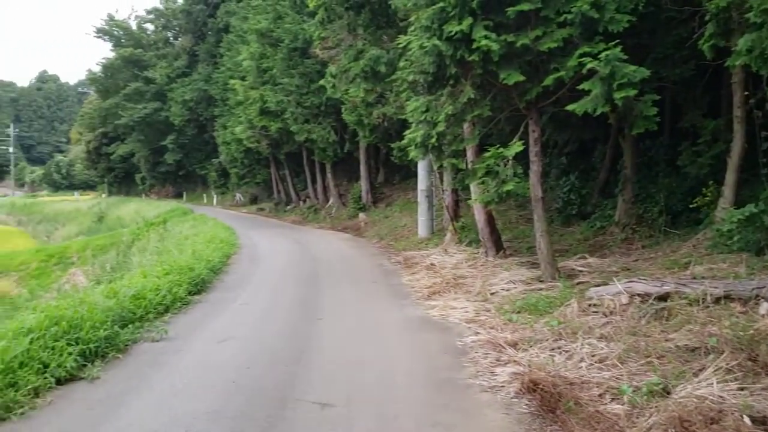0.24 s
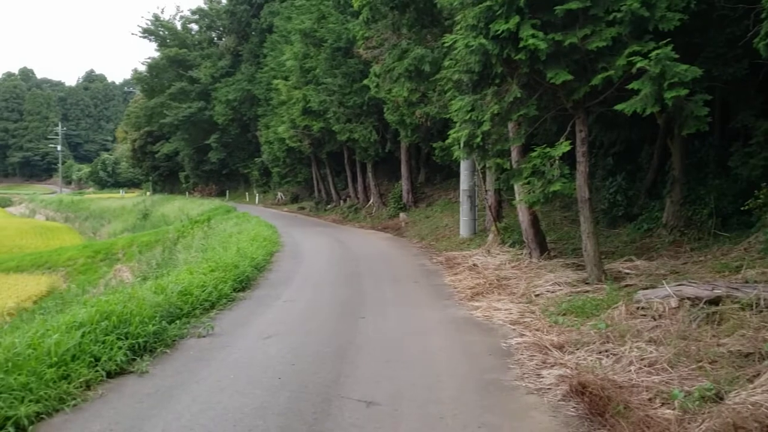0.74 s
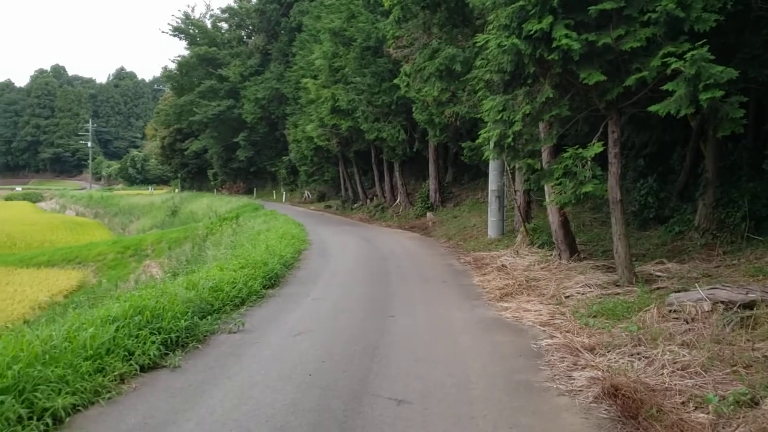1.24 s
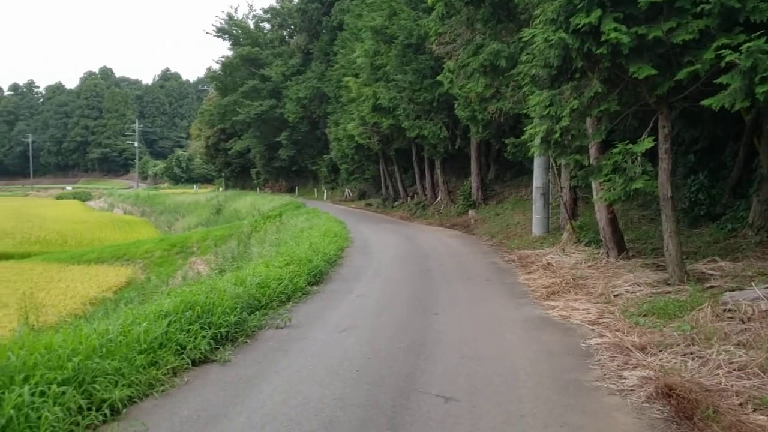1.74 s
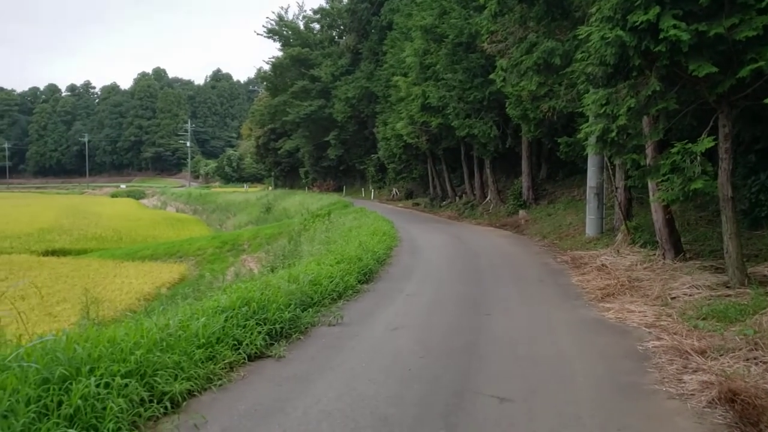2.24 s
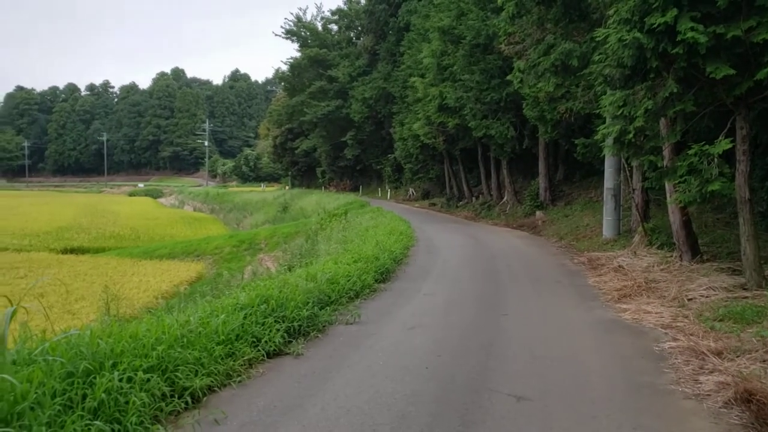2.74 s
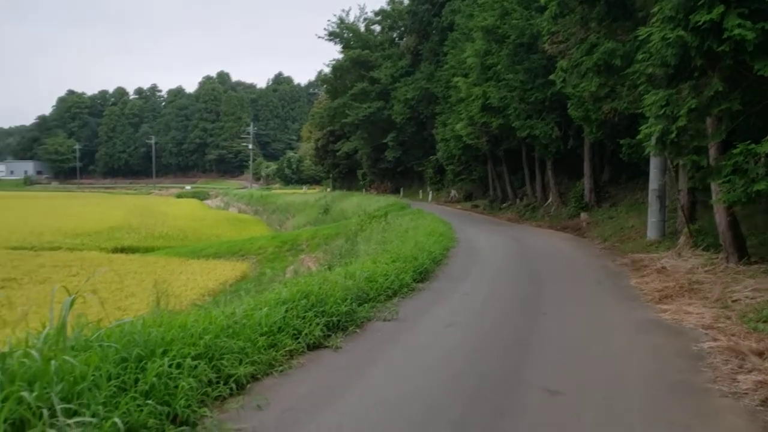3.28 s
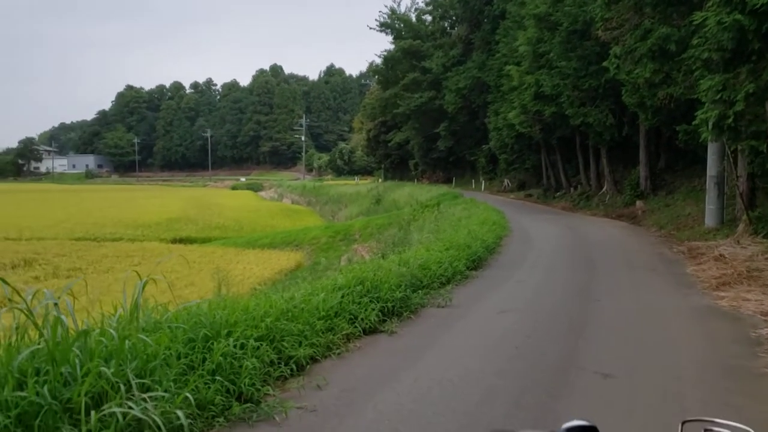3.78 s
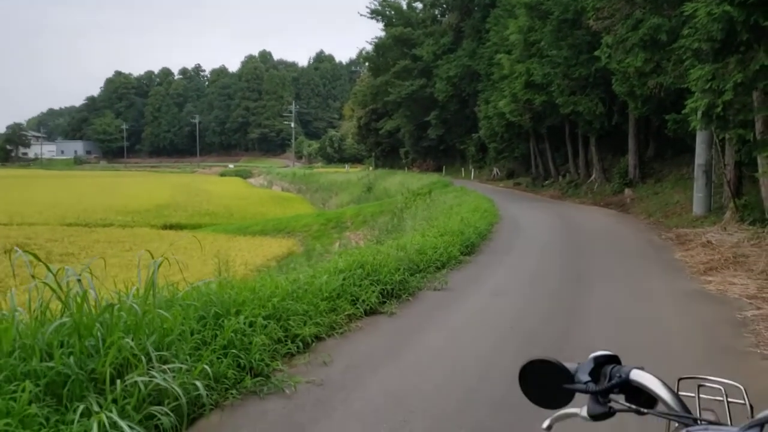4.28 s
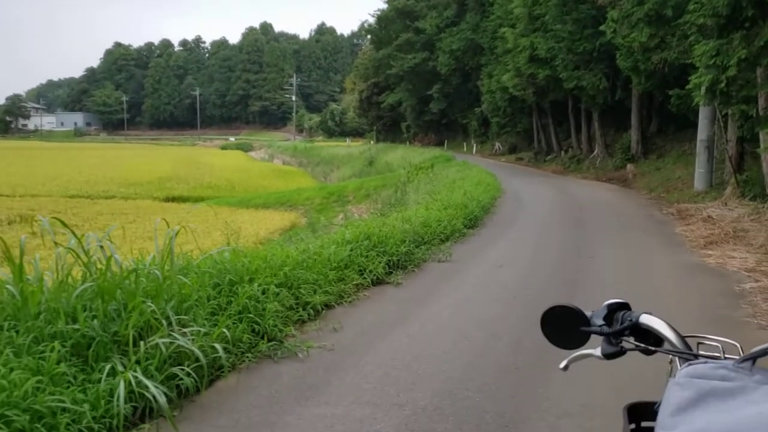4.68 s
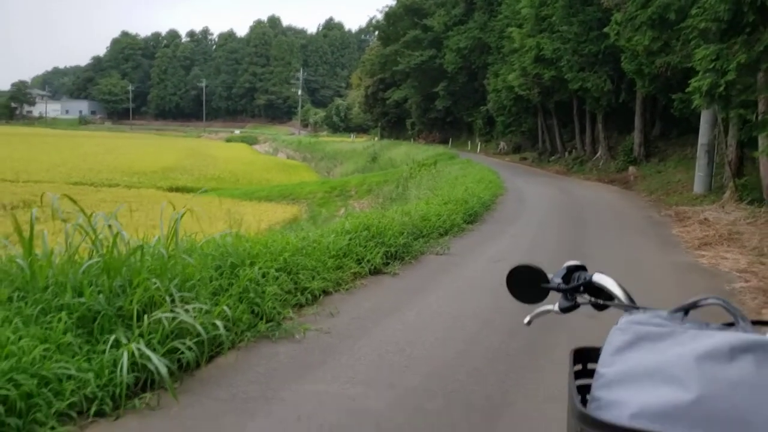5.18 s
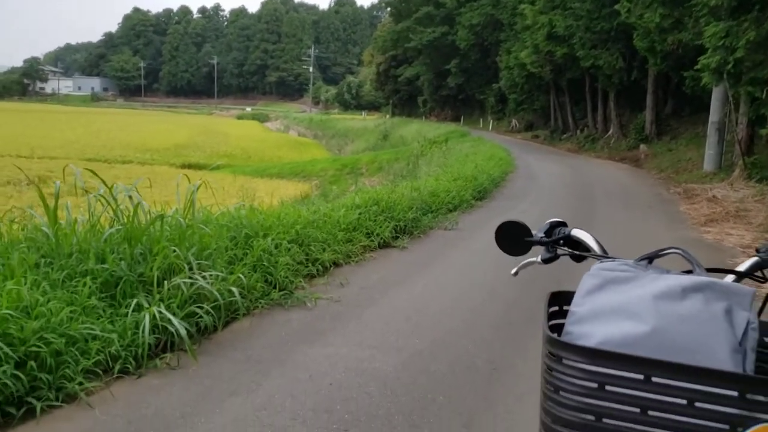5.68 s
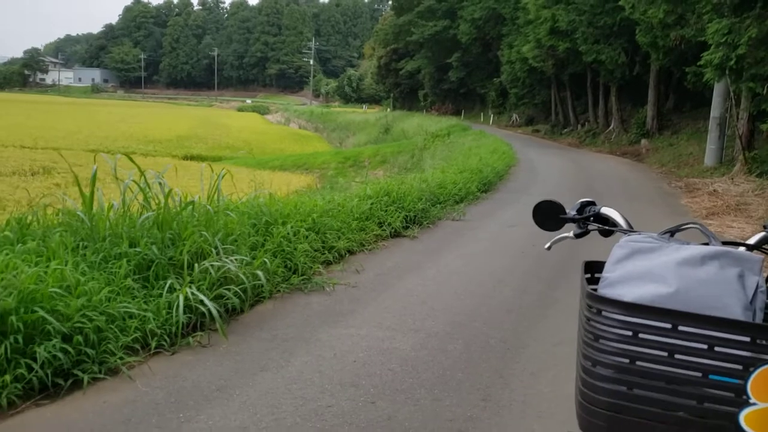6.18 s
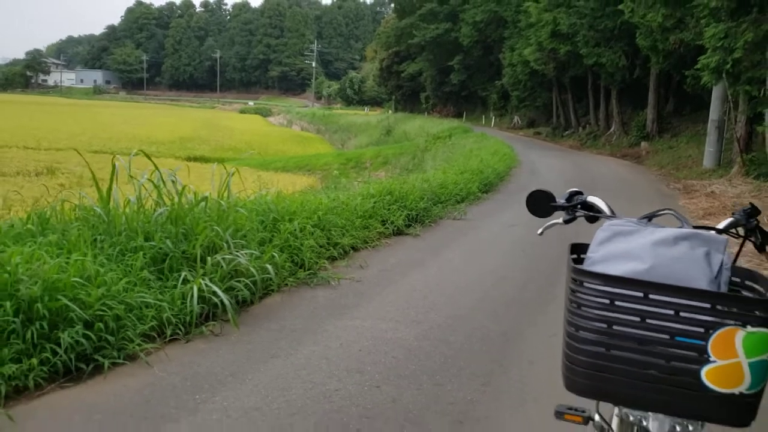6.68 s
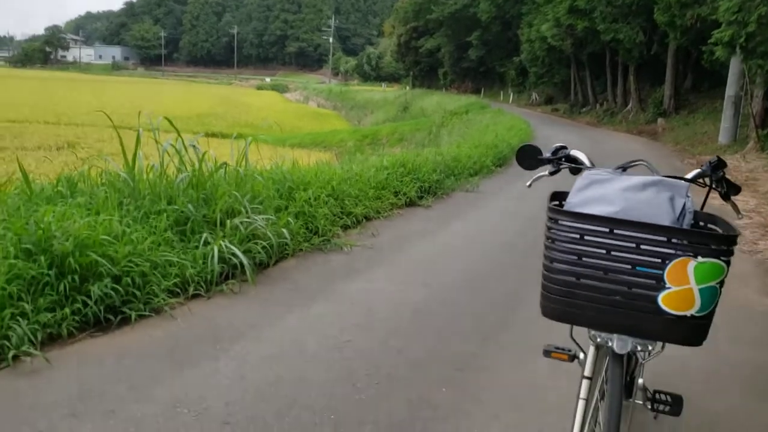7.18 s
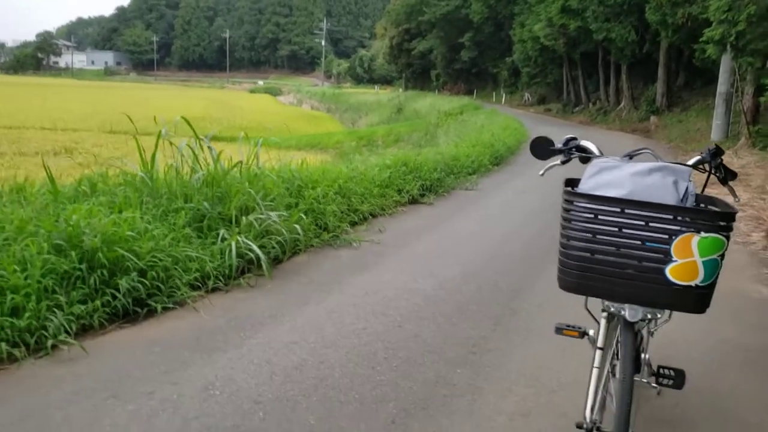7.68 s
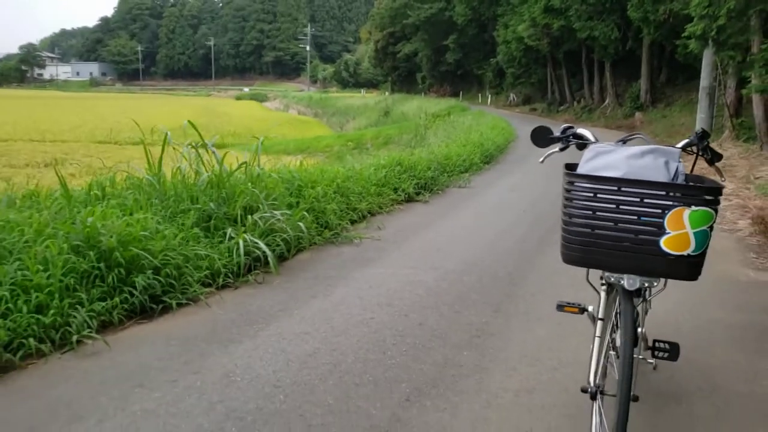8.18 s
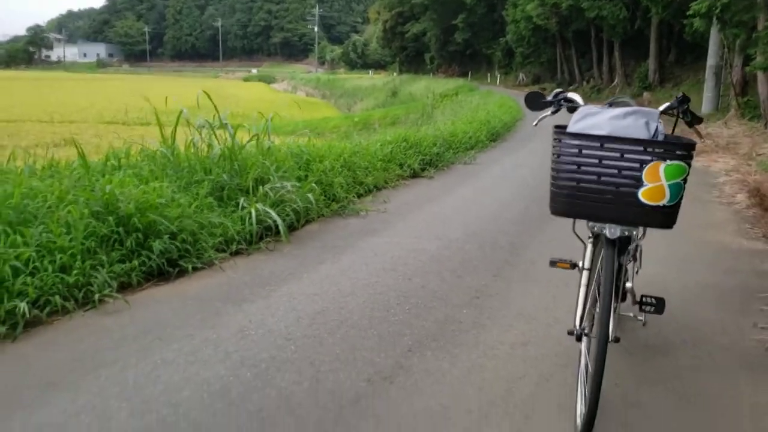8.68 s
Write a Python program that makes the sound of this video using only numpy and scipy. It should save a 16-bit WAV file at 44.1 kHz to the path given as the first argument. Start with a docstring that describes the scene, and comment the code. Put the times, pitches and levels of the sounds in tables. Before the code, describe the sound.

Outdoors beside a wood and rice fields, evening cicadas sing in quick, ringing pulses, about eight a second. One fades, a second swells early and slows, then a louder one bursts in after the middle. A blurred, echoing chorus and airy insect hiss lie behind. Low wind flutters on a handheld microphone, strongest at the end, with faint scuffs and soft heel thuds from slow steps.

```python
"""Evening cicadas trill in the trees beside a rice-field lane: five near ones, a blurred chorus behind them.
Each syllable is a stack of partials buzzed by the drumming muscles; fading noise tails make the wood's echo.
Shaped noise makes the hiss of distant insects and leaves, a road humming far off and wind on two microphone
ports. Someone walks slowly backwards: soles scuff as bursts of noise, heels thud as short low rings."""
import sys
import numpy as np
from scipy import signal
from scipy.fft import rfft, irfft, next_fast_len
from scipy.io import wavfile
from scipy.ndimage import uniform_filter1d

SR = 44100
rng = np.random.default_rng(int(sys.argv[2]) if len(sys.argv) > 2 else 0)


def pcm_store(signal):
    """Save signal as 16-bit PCM."""
    levels = np.round(np.clip(np.atleast_2d(signal), -1, 1) * 32767)
    wavfile.write(sys.argv[1], SR, levels.astype(np.int16).T)


N = 393813  # samples in the scene


def undb(db):
    """Turn decibels into a factor on the amplitude."""
    return np.exp(np.asarray(db) * np.log(10) / 20)


def level(x, db):
    """Scale a sound to the given average (rms) level in dB."""
    return x * undb(db) / np.sqrt(np.mean(x ** 2))


def curves(table, times=None):
    """Join the rows of a time table by straight lines: one value a sample, or at the given times in s."""
    if times is None:
        times = np.arange(N) / SR
    row_times, *columns = np.transpose(table)
    return np.array([np.interp(times, row_times, column) for column in columns])


def sides(pan_db):
    """Factors for the left and right port that differ by pan_db."""
    return undb(np.array([pan_db, -pan_db]) / 2)


def add(out, x, s):
    """Mix x into out from time s, cutting off whatever runs past the end."""
    i = int(s * SR)
    out[..., i:i + x.shape[-1]] += x[..., :max(out.shape[-1] - i, 0)]


def coloured(points, channels):
    """Noise whose spectrum follows the (f/Hz, level/dB) points."""
    size = next_fast_len(N)
    hz, db = np.transpose(points)
    bins_hz = np.arange(size // 2 + 1) * SR / size
    gain = undb(np.interp(np.log(bins_hz + 1), np.log(hz), db, -90))
    white = rng.standard_normal((channels, size))
    return irfft(rfft(white) * gain, size)[:, :N]


def walk(rate):
    """A random wandering curve: values held for 1 / rate s, smoothed twice; spread near 1."""
    k = int(SR / rate)
    stairs = np.repeat(rng.standard_normal(N // k + 1), k)
    return 1.47 * uniform_filter1d(uniform_filter1d(stairs, k), k)[:N]


def wide(points, db, shared):
    """Steady coloured noise of which a share is common to both ports."""
    mid, *ears = coloured(points, channels=3)
    return level(shared * mid + np.array(ears), db)


def trunks(x, t60_s):
    """Dense scatter off the trunks: a noise tail fading by 60 dB in t60_s, of unit energy, for each ear."""
    t = np.arange(SR) / SR
    fade = np.exp(-np.log(1000) * t / t60_s)
    onset = 1 - np.exp(-t / 0.0037)
    tail = rng.standard_normal((2, SR)) * fade * onset
    tail /= np.sqrt(np.sum(tail ** 2) / 2)
    return signal.fftconvolve(x[None], tail, axes=1)[:, :len(x)]


def syllable(length_s, hz, peak_db, glide_hz, slow, buzz_db, buzz_phase):
    """Six complex partials; the muscles buzz each at their rate and at half of it."""
    # envelope and buzz, one row per partial: rise/s (times slow), share of the length before the fall,
    # sag/(dB per s), fall/s, lower buzz line/dB, upper buzz line/dB, half-rate lines/dB;
    # buzz_db is added to the three buzz columns
    partial_rows = [(0.01, 1.54, -25, .006, -22, -21, -14), (0.013, 1.5, -22.5, 0.0031, -10, -15.5, -29),
                    (.0028, 1.8, -150, 0.0065, -5, -13, -34), (.0028, 1.4, -110, .006, -1.5, -34, -14.5),
                    (.0028, 0.59, -110, .006, 0.5, -18, -23), (.0035, 1.03, -110, .006, 2, -9, -15)]
    sixth_db = -12.5  # sixth partial against the fifth
    t = np.arange(int(.075 * SR)) / SR
    rise, share, sag_db, fall, low_db, up_db, half_db = np.transpose(partial_rows)[:, :, None]

    attack = 1 - np.exp(-t / np.abs(rise * slow))
    decay = np.exp(-np.maximum(t - share * length_s, 0) / np.abs(fall))
    shape = attack * undb(sag_db * t) * decay

    buzz_hz = 312.2 * hz / 2130  # the muscle rate follows the pitch
    half = np.exp(1j * (np.pi * buzz_hz * t + buzz_phase))  # turns at half the muscle rate
    full_rate = undb(low_db) * half.conj() ** 2 + undb(up_db) * half ** 2
    half_rate = 2 * undb(half_db) * half.real
    buzz = 1 + undb(buzz_db) * (full_rate + half_rate)

    turns = hz * t + glide_hz * (t / length_s - 1) * t / 2
    first = np.exp(2j * np.pi * turns)
    stack = np.cumprod(np.tile(first, (len(partial_rows), 1)), axis=0)  # powers of the first partial
    all_db = np.append(peak_db, peak_db[-1] + sixth_db)
    return undb(all_db)[:, None] * shape * buzz * stack


def far_chorus(count=9):
    """Many singers deep in the wood, each at its own pitch and pace, heard only as echo; they began a second ago."""
    # swells of the chorus: t/s, swell/dB, level of the first partial/dB, middle pitch f/Hz
    chorus_swells = [(0.0, 2.5, -57.5, 2140), (0.89, 2, -57, 2128), (1.66, 3, -58, 2120),
                     (2.19, 2.5, -59, 2124), (2.86, 2, -56, 2121), (3.5, -1, -59, 2130),
                     (4.23, -4.5, -59.5, 2124), (5.62, -4.5, -62, 2122), (6.14, -0.5, -60, 2145),
                     (6.6, 7, -53.5, 2153), (7.3, 4, -55.5, 2146), (7.83, 6, -55.5, 2152),
                     (8.93, 3.5, -57, 2151)]
    # partials 2 to 5, a row each: level/dB, level gained per dB of swell/(dB per dB)
    upper_partials = [(-53.5, 1), (-60.5, 1.23), (-63, 1), (-64.5, 0.4)]
    timbre_db, gained = np.transpose(upper_partials)
    out = np.zeros(N + SR)  # one second more at the start
    for place in np.linspace(-1, 1, count):
        pace_s = .12 + .012 * rng.standard_normal()
        for s in np.arange(rng.random() * pace_s, N / SR + 1, pace_s):
            swell_db, first_db, middle_hz = curves(chorus_swells, s - 1)
            hz = middle_hz + 65 * place + 12 * rng.standard_normal()
            peak_db = np.append(first_db, timbre_db + gained * swell_db) + 3 * rng.standard_normal(5)
            voice = syllable(0.0331, hz, peak_db, glide_hz=-16.0, slow=0.84, buzz_db=-0.54,
                             buzz_phase=10 * rng.standard_normal())
            add(out, voice.real.sum(0), s)
    return trunks(out, t60_s=1)[:, SR:] * sides(1.8)[:, None]


def distant_hiss():
    """Distant insects and leaves: noise that swells as the listener turns and the chorus grows."""
    # spectrum, of which only the shape counts: f/Hz, level/dB
    hiss_colour = [(400, -18.5), (700, -18.5), (1450, -20), (1800, -5.5), (2600, -10), (3550, -10.5),
                   (3850, 2), (5300, 4), (7300, -2.5), (8900, -9), (9400, -14.5), (10000, -16),
                   (12000, -6.5), (15500, -11.5)]
    # loudness, around which the hiss wavers: t/s, level/dB
    hiss_levels = [(0.0, -55.5), (1.19, -53.5), (2.11, -55), (2.86, -53), (6.12, -53), (6.72, -50),
                   (8.93, -50.5)]
    swell = undb(curves(hiss_levels) + 0.69 * walk(5))
    return wide(hiss_colour, 0, shared=0.21) * swell * sides(1)[:, None]


def far_road():
    """A far-off road: low noise, mostly alike at both ports, that grows as the road draws nearer."""
    # spectrum, of which only the shape counts: f/Hz, level/dB
    road_colour = [(100, -11), (170, -2.5), (310, -2.5), (400, -10.5), (600, -17.5)]
    # loudness, around which the rumble wavers: t/s, level/dB
    road_levels = [(0, -75), (1.5, -69), (3.5, -67), (8.93, -67)]
    return wide(road_colour, 0, shared=1.35) * undb(curves(road_levels) + 2.8 * walk(3.97))


def rings(table, cycles, alike):
    """Each row pushes a low resonance that swells and dies within a few cycles; alike 1 = in step at both ports."""
    out = np.zeros((2, N))
    t = np.arange(int(.12 * SR)) / SR
    for s, db, hz, pan_db in table:
        phase = np.array([[0], [(1 - alike) * rng.standard_normal()]])
        age = t * hz / cycles  # 1 at the top of the swell
        swell = (age * np.exp(1 - age)) ** 2
        ring = np.sin(2 * np.pi * hz * t + phase) * swell
        add(out, undb(db) * ring * sides(pan_db)[:, None], s)
    return out


def wind():
    """Turbulence presses on each port alone and flutters; eddies land as single buffets on the windward port."""
    # steady wind: t/s, average level/dB, left minus right/dB
    wind_levels = [(0.0, -57.5, -7), (0.5, -56, -2.5), (0.9, -52.5, -1), (2.1, -53, -4.5), (3.6, -51.5, -4),
                   (4.15, -53.5, -3.5), (4.9, -51.5, -6), (6.2, -51, -4), (6.67, -52, -7), (7.05, -50, -1),
                   (7.68, -54, -7.5), (7.98, -46, 7), (8.45, -43, 9), (8.55, -51.5, -2.5), (8.68, -41, 10),
                   (8.83, -45, 1.5), (8.93, -40.5, 10)]
    # spectrum, of which only the shape counts: f/Hz, level/dB
    wind_colour = [(12, -30), (20, -2), (35, -5.5), (59, 5.5), (124, -8), (143, -11.5), (167, -15.5),
                   (260, -28.5), (340, -36.5), (570, -120)]
    # single buffets: t/s, top of the swell/dB, f/Hz
    buffet_rows = [(0.557, -40, 73.7), (0.942, -43, 51.8), (1.153, -42, 116), (1.501, -42, 51),
                   (1.796, -49, 61.4), (2.179, -39.5, 56.7), (2.348, -41, 102), (2.481, -41, 56.5),
                   (2.771, -37.5, 79), (3.646, -42, 52.6), (4.86, -51, 80), (5.351, -47, 73.5),
                   (6.9, -53, 120), (7.098, -48, 54.4), (7.109, -43, 130), (7.318, -51, 42.7),
                   (7.817, -43, 57.7), (7.995, -36.5, 87.6), (8.064, -36, 122), (8.116, -41.5, 62),
                   (8.2, -58, 61.9), (8.256, -33.5, 75), (8.338, -36.5, 58), (8.397, -34, 115),
                   (8.428, -42, 65), (8.655, -33.5, 70.5), (8.686, -35, 64.7), (8.808, -40, 78.1),
                   (8.884, -43, 96)]
    buffet_lean = 2.77  # a buffet's left-right difference is this many times the steady wind's, in dB
    level_db, pan_db = curves(wind_levels)
    flutter = undb([1.8 * walk(25), 1.87 * walk(25)])
    turbulence = level(coloured(wind_colour, channels=2) * flutter, 0)
    steady = turbulence * undb(level_db) * sides(pan_db)
    buffets = [(s, db, hz, buffet_lean * curves(wind_levels, s)[1]) for s, db, hz in buffet_rows]
    return steady + rings(buffets, cycles=0.92, alike=-1.8)


def near_cicadas():
    """Direct sound, each partial with its own phase at the two ports and a trembling level, plus the wood's echo."""
    # one table per cicada, a row per syllable: t/s, level/dB (the timbre and scatter below are added)
    songs = [
        [(0.02, -47.5), (0.141, -45.5), (0.294, -47), (0.462, -46), (0.582, -48), (0.696, -46.5), (0.825, -45),
         (0.939, -48), (1.074, -50), (1.191, -49), (1.314, -50), (1.431, -49.5), (1.551, -52)],
        [(0.938, -39), (1.047, -36.5), (1.162, -34.5), (1.266, -35), (1.377, -37), (1.49, -36.5), (1.6, -35),
         (1.715, -34.5), (1.831, -34.5), (1.959, -37), (2.066, -37), (2.183, -37), (2.31, -40), (2.429, -40),
         (2.55, -41), (2.663, -40.5), (2.779, -42.5), (2.9, -44.5), (3.022, -47.5), (3.141, -47.5),
         (3.264, -47), (3.383, -45), (3.505, -47), (3.623, -45.5), (3.743, -49), (3.869, -49), (3.988, -46.5),
         (4.114, -46), (4.238, -44.5), (4.361, -44.5), (4.485, -46), (4.615, -46), (4.74, -50.5),
         (4.864, -49.5), (4.999, -49), (5.125, -49), (5.261, -53), (5.393, -54), (5.53, -50.5), (5.675, -52.5),
         (5.817, -51.5), (5.964, -49.5), (6.122, -49.5), (6.287, -50.5), (6.48, -51), (6.683, -48.5),
         (6.911, -50), (7.163, -46.5), (7.452, -49)],
        [(5.7, -35), (5.819, -35), (5.922, -35.5), (6.029, -31.5), (6.132, -27.5), (6.233, -29.5), (6.344, -30),
         (6.446, -29.5), (6.557, -33), (6.668, -33.5), (6.781, -35.5), (6.9, -34), (7.016, -34), (7.131, -32),
         (7.251, -31), (7.364, -31), (7.483, -32.5), (7.605, -34.5), (7.726, -34), (7.846, -35.5), (7.957, -38),
         (8.072, -37.5), (8.198, -37), (8.318, -37), (8.445, -39), (8.558, -37.5), (8.672, -41), (8.79, -45),
         (8.912, -46)],
        [(6.448, -46.5), (6.568, -40.5), (6.664, -46), (6.781, -45), (6.904, -40), (7.024, -41), (7.147, -51),
         (7.267, -44.5), (7.387, -40), (7.51, -39), (7.633, -48), (7.753, -52), (7.876, -46), (8.002, -45.5),
         (8.137, -47), (8.251, -44), (8.371, -45.5), (8.5, -48), (8.623, -47), (8.752, -47), (8.887, -45.5)],
        [(7.032, -44), (7.158, -44.5), (7.29, -42.5), (7.416, -42.5), (7.539, -49), (7.665, -43), (7.791, -45),
         (7.917, -46.5), (8.046, -46)],
    ]
    # how each song runs, one table per cicada: t/s, pitch f/Hz, syllable length/s,
    # change of the third partial/dB, change of the partials above it/dB, left minus right/dB
    phrases = [
        [(0.14, 2138, 0.022, -5, -3.5, -3), (0.7, 2139, 0.029, -3, 0, 4), (1.55, 2117, 0.018, 5, 3.5, 0)],
        [(0.94, 2053, 0.016, -10, -11.5, 3), (1.16, 2100, 0.013, -13, -7.5, -0.5),
         (1.4, 2135, 0.025, -12, -4.5, -0.5), (1.95, 2128, 0.027, -7, -5, 1.5),
         (2.31, 2113, 0.025, -1, -3.5, -1), (2.75, 2094, .029, 4, 0.5, -2), (3.4, 2077, 0.028, 3, 5.5, -3.5),
         (3.8, 2083, 0.025, 4.5, 7.5, 3), (4.5, 2082, 0.024, -0.5, 5, -0.5), (5.05, 2072, 0.025, 7.5, 5.5, -1),
         (5.7, 2053, 0.029, 12.5, 7.5, -0.5), (6.5, 2034, 0.021, -2, 10.5, 0), (7.45, 2026, 0.019, -11, 0, -4)],
        [(5.7, 2045, 0.0051, -12, -25, 0), (6.03, 2171, 0.018, -4, -27, 2), (6.2, 2200, 0.026, -3, -8.5, -0.5),
         (6.45, 2191, 0.042, -4.5, -6.5, -1), (6.85, 2171, .03, 3, 2, 2.5), (7.3, 2162, 0.025, -3.5, -5, 4.5),
         (8.0, 2144, 0.025, 4, 2, 1), (8.45, 2141, 0.013, 4.5, 1, -0.5), (8.92, 2141, 0.029, 2, 9.5, 4)],
        [(6.45, 2205, 0.039, -6, -1, -2), (6.7, 2255, 0.03, 7, 11, 5), (7.2, 2227, 0.027, -9, -6, -12),
         (8.0, 2211, 0.036, 6, 3, 4), (8.9, 2196, 0.033, 5.5, 1, -8)],
        [(7.03, 2197, 0.029, -8, 0.5, 6), (8.05, 2180, 0.041, 5, -2.5, 6)],
    ]
    # one row per cicada: level of partials 1 to 5/dB against the song's level
    timbres = [(-7.5, 0.0049, -1, -3, -9), (-8.5, 0.0057, -3.5, -2, -5.5), (-16.5, 0, -3, -11.5, -19.5),
               (-11, 0.046, -7, -11, -13), (-19, 0, -10, -7, -2.5)]
    # one row per cicada: pitch glide over a syllable/Hz, slowness of attack (a factor), buzz/dB
    singers = [(-4.5, 0.79, -6), (-12.5, 0.76, -7), (7, 0.4, -4), (-8.5, 0.76, -5.5), (-11, 0.72, -9)]
    # one row per cicada, a column per partial: how far the left port leads the right/rad
    port_leads = [(.4, 1.2, 1., -2.2, 1.2, 1.2), (.2, 1.2, 1.3, .5, 2.2, 1.5),
                  (-2.8, -1.5, 1.2, -.6, .5, 2.), (.5, 1.3, 1.2, 1.3, 1.2, 1.2),
                  (.5, 1.3, 1.2, -.6, .5, 1.2)]
    # one row per cicada, a column per partial: how much the phone's body favours the left port/dB
    body_leans = [(2.7, 6.6, 3.3, -8, -7, 1), (5.4, 2.4, 1, -6, -5.5, 1), (2.6, 2.6, 3.6, 3, 8, 1),
                  (1, 1, 1.5, -7, -3, 1), (1, 1, 1.5, 2, -2.5, 1)]
    scatter_db, buzz_scatter_db = 1.5, 2.05  # from syllable to syllable
    lead_scatter = 0.13  # rad, times the number of the partial
    rough, rough_hz = 0.2, 138.5  # roughness of the partials: depth and rate
    out = np.zeros((2, N))
    wobble = 1 + rough * (walk(rough_hz) + 1j * walk(rough_hz))

    cicadas = zip(songs, phrases, timbres, singers, port_leads, body_leans)
    for song, phrase, timbre_db, (glide_hz, slow, buzz_db), leads, lean_db in cicadas:
        for s, db in song:
            hz, length_s, third_db, upper_db, pan_db = curves(phrase, s)
            peak_db = db + np.add(timbre_db, [0, 0, third_db, upper_db, upper_db])
            peak_db = peak_db + scatter_db * rng.standard_normal(5)
            voice = syllable(length_s, hz, peak_db, glide_hz, slow,
                             buzz_db + buzz_scatter_db * rng.standard_normal(),
                             buzz_phase=10 * rng.standard_normal())

            # each partial trembles by its own stretch of the wobble and starts at its own phase
            chance = rng.standard_normal((6, 1))
            stretch = (N * np.abs(chance)).astype(int) + np.arange(voice.shape[1])
            voice = voice * wobble[stretch % N] * np.exp(10j * chance)

            left, right = sides(pan_db + np.array(lean_db))
            numbers = np.arange(1, len(leads) + 1)
            lag = np.exp(-1j * (leads + lead_scatter * numbers * rng.standard_normal(6)))
            add(out, np.array([left @ voice, (right * lag) @ voice]).real, s)

    wood = undb(-17.5) * trunks(out.mean(0), t60_s=0.98)
    leaves = undb(-10.5) * trunks(out[0], t60_s=0.079)  # quick scatter close to each singer
    return out + wood + leaves


def footsteps():
    """A scuff is grainy noise with a dull and a bright part; a thud is one quickly damped low ring."""
    # heels and handling thuds: t/s, top of the swell/dB, f/Hz, left minus right/dB
    thuds = [(0.564, -57, 204.5, -20), (1.152, -55, 208, -14), (2.734, -41, 266, -3.0),
             (2.842, -39, 238, -3.5), (3.442, -52, 342, -2.5), (4.016, -52, 308.7, -3.5),
             (4.178, -56, 197.7, -30), (4.679, -55.5, 202, -2.0), (4.875, -49, 290, -3),
             (5.34, -55, 310.3, -3.5), (5.766, -53.5, 198, -4), (6.0, -49, 310, -2.0),
             (6.642, -50.5, 223, -2.5), (6.716, -48.5, 207, 0.0), (7.106, -50, 243, -13),
             (7.494, -52, 279, -3.5), (7.761, -54, 224, -25), (8.321, -47.5, 282, 2.5), (8.79, -49, 340, 0)]
    # soles scuffing grit: t/s, level/dB, length/s (stretched 1.6 times), gain of the bright part/dB
    scuffs = [(2.5, -66.5, 0.066, 3), (2.82, -66, 0.062, 6), (3.281, -63.5, 0.1, -17),
              (3.406, -67, 0.038, -15), (3.717, -75, .15, 10), (3.838, -63, 0.048, 9),
              (4.427, -63.5, 0.079, 1), (4.865, -63, 0.028, 1), (5.35, -63, 0.051, 3),
              (5.765, -59.5, 0.032, 6.5), (6.706, -65.5, 0.04, 5.5), (7.095, -63, 0.025, 3),
              (7.504, -56, 0.061, 6), (7.836, -62, 0.03, 1), (8.215, -67, 0.046, 6),
              (8.294, -63.5, 0.061, 9), (8.598, -64, 0.0047, 14.5), (8.767, -56.5, 0.073, 2)]
    out = rings(thuds, cycles=0.59, alike=0.92)
    grains = rng.standard_normal((3, N)) * undb(1.1 * walk(300))
    grit = grains[0] + 0.8 * grains[1:]  # partly common to both ports
    dull_band = signal.butter(2, [850, 2100], "band", fs=SR, output="sos")
    bright_band = signal.butter(2, [1800, 9000], "band", fs=SR, output="sos")
    dull = level(signal.sosfilt(dull_band, grit), 0)
    bright = level(signal.sosfilt(bright_band, grit), 3.8)
    for s, db, length_s, bright_db in scuffs:
        i = int(s * SR)
        part = np.linspace(0, 1, int(1.6 * length_s * SR))
        drag = np.sin(np.pi * part ** 0.58) ** 1.17  # quick contact, slower lift
        scrape = (dull + undb(bright_db) * bright)[:, i:i + len(part)]
        add(out, undb(db) * drag * scrape * sides(1.5)[:, None], s)
    return out


def scene():
    """Everything heard on the lane, added together."""
    return far_chorus() + distant_hiss() + far_road() + wind() + near_cicadas() + footsteps()


def record(dry):
    """The phone cuts the top: a steep low-pass filter at 15740 Hz."""
    return signal.sosfilt(signal.ellip(14, .3, 70, 15740, fs=SR, output="sos"), dry)


dry = scene()
out = record(dry)
pcm_store(out)
```